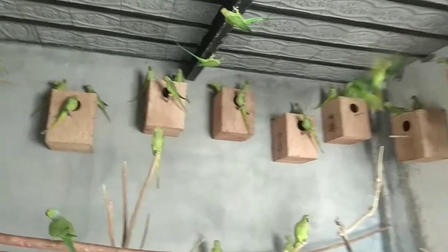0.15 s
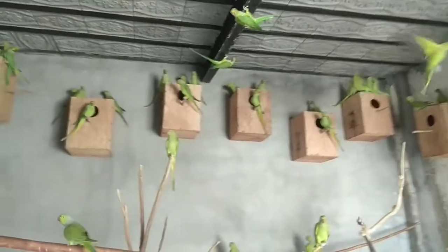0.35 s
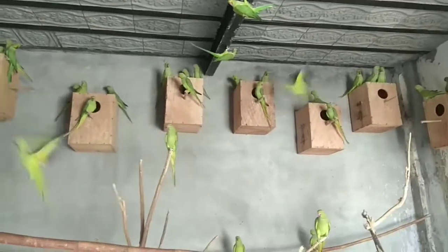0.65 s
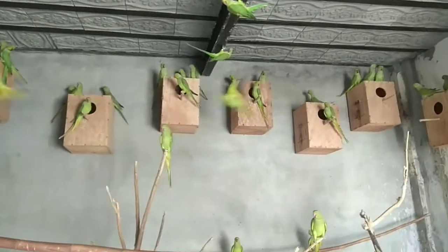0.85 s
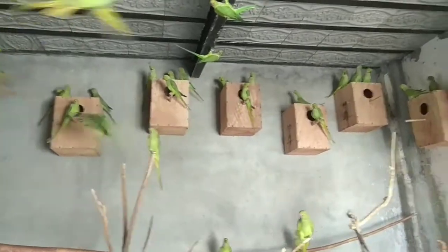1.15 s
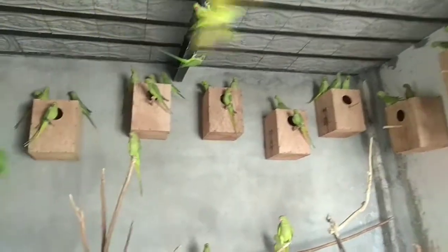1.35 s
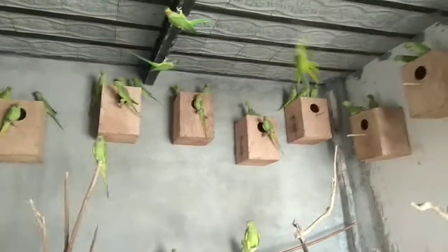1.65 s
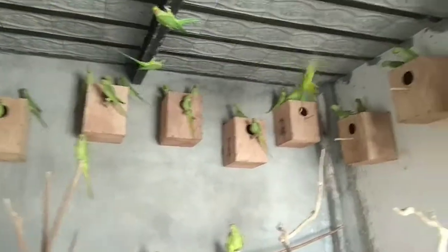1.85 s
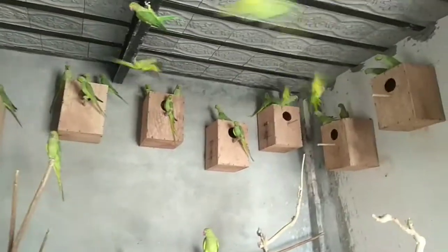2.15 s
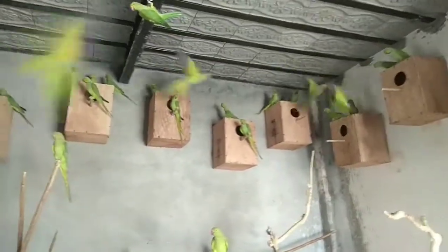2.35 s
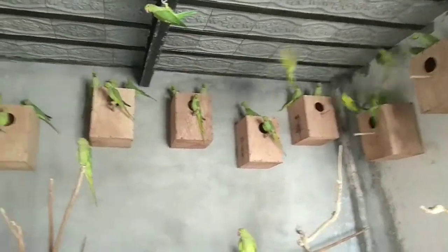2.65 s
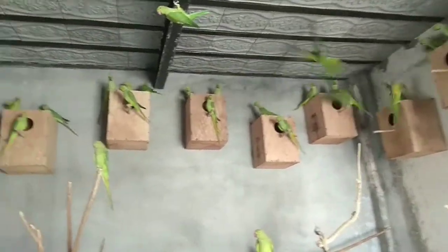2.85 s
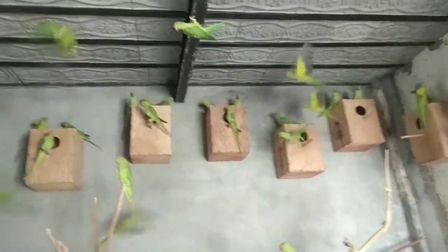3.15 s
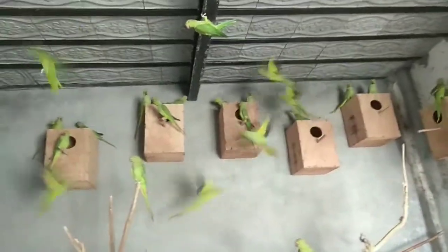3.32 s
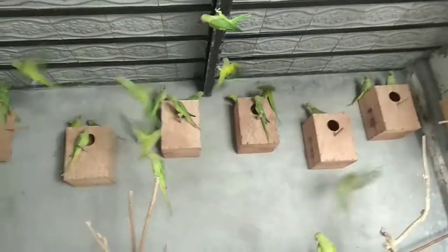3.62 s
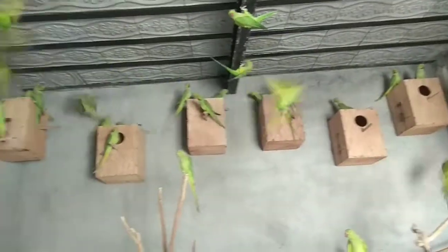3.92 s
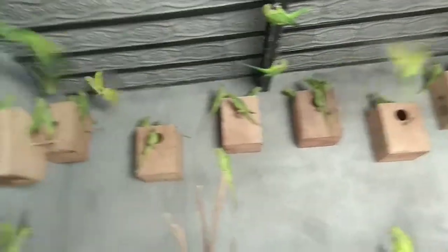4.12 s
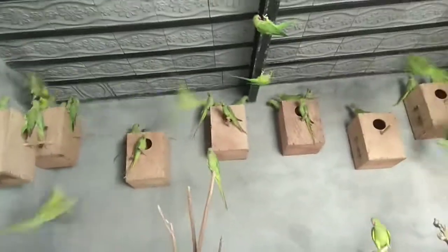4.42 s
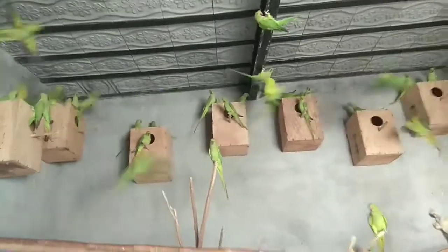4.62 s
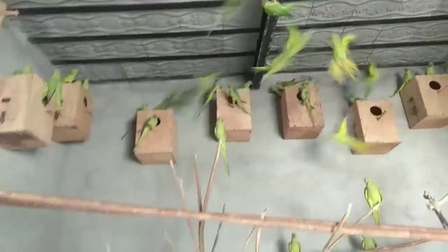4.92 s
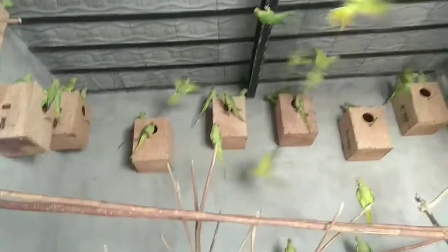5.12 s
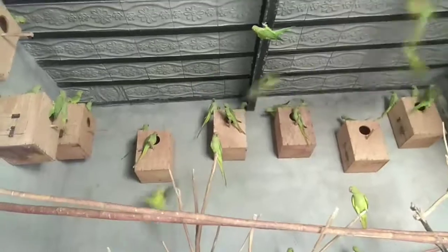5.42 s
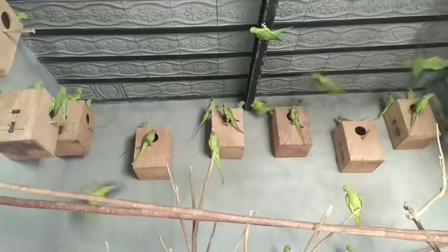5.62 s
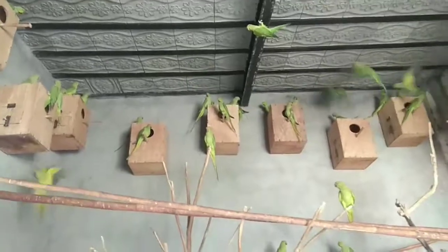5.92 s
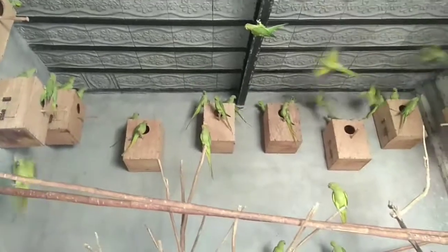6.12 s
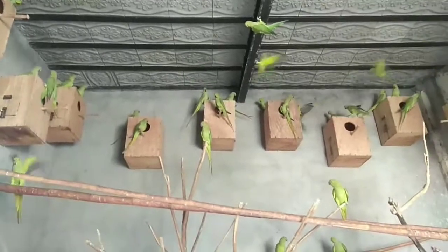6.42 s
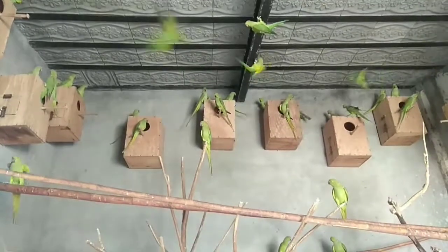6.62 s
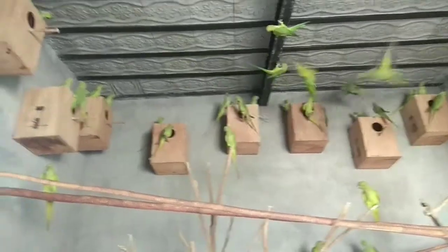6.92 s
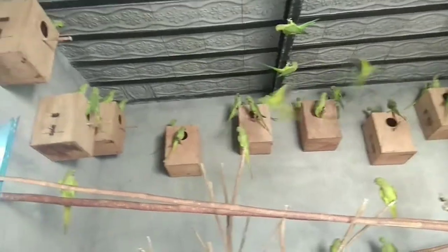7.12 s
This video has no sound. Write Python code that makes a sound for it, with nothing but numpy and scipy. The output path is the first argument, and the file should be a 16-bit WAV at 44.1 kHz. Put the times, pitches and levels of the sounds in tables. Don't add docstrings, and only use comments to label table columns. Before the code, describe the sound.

In a concrete aviary, one parakeet repeats a short, arched, piercing screech about four times a second while others rasp over it and a distant fowl glides softly low. Then croaks, noisy bursts and falling whistles follow as wings thump and rustle close to the microphone. Calls pause, claws scratch wood, and finally a few duller swooping calls and chirps return. Hazy echoes trail every call.

```python
import sys
import numpy as np
from scipy import signal
from scipy.io import wavfile
from scipy.ndimage import uniform_filter1d, minimum_filter1d

SR = 44100
rng = np.random.default_rng(int(sys.argv[2]) if len(sys.argv) > 2 else 0)


def how_loud(loudness_db):
    steps = np.asarray(loudness_db, float) / 20
    return 10 ** steps


def generate_wav(signal):
    frames = np.transpose(np.atleast_2d(signal))
    scaled = np.clip(frames, -1, 1) * 32767
    pcm = np.round(scaled).astype(np.int16)
    wavfile.write(sys.argv[1], SR, pcm)


N = 320607

# (time [s], level [dB])
FLIGHT = [(0, -50), (.28, -41.5), (.44, -45.5), (.84, -38), (1.11, -49.5), (1.28, -38), (1.9, -45),
          (2.5, -36.5), (2.72, -47), (2.8, -38.5), (3.12, -42), (3.2, -33.5), (5.03, -34.5), (5.67, -39.5),
          (6.2, -38), (6.35, -46), (7.03, -41), (7.27, -47)]


def evened(x):
    return x / np.sqrt(np.mean(abs(x) ** 2) + 1e-20)


def read(points, hz):
    f, value = np.transpose(points)
    return np.interp(np.log(hz + 1), np.log(f + 1), value)


def add(mix, s, sound):
    part = mix[..., round(s * SR):][..., :sound.shape[-1]]
    part += sound[..., :part.shape[-1]]


def wobble(count, hz):
    z = rng.standard_normal(count) + 1j * rng.standard_normal(count)
    r = np.exp(-2 * np.pi * hz / SR)
    return evened(signal.lfilter([1], [1, -2 * r, r * r], z))


def air(colour, curve, patchy_db, beat_db, size):
    # (frequency [Hz], left-right likeness [-1 to 1])
    likeness = [(25, 0.77), (60, 0.8), (150, 0.98), (380, 0.93), (950, 0.16), (2380, -0.042), (5980, 0.022),
                (15000, -0.064)]
    hop = size // 4
    frames, hz = N // hop + 5, np.fft.rfftfreq(size, 1 / SR)
    a, b, c, d, patches = rng.standard_normal((frames, len(hz), 5)).T
    patches = uniform_filter1d(patches, size=6, axis=0)
    patches = evened(uniform_filter1d(patches, size=12, axis=1))
    t = np.arange(frames) * hop / SR
    beat_rates_hz = np.geomspace(9, 32, num=14)
    beats = evened(sum(np.sin(2 * np.pi * (f * t + rng.random())) for f in beat_rates_hz))

    same = np.clip(read(likeness, hz), -1, 1)[:, None]
    left = a + 1j * b
    right = same * left + np.sqrt(1 - same ** 2) * (c + 1j * d)
    level_db = read(colour, hz)[:, None] + patchy_db * patches + beat_db * beats
    z = np.array([left, right]) * how_loud(level_db)
    noise = signal.istft(z, nperseg=size, noverlap=size - hop)[1][:, :N]
    s, curve_db = np.transpose(curve)
    return how_loud(np.interp(np.arange(N) / SR, s, curve_db)) * evened(noise)


def wing_thump():
    # (frequency [Hz], level [dB per Hz])
    thump_colour = [(15, -70), (25, -41), (64, -80), (113, -13), (216, -8), (266, 1), (375, -7),
                    (706, -10.5), (769, -10), (928, -16), (1500, -44), (1950, -64), (3300, -120)]
    # (time [s], level above the flock [dB])
    flaps = [(4.46, 3), (5.03, 3), (5.46, 3), (5.698, 3.5), (5.77, 3.5), (6.07, 4), (6.209, 1.5), (6.6, 2)]
    half_width_s = 0.013
    t = np.arange(0, N / SR + .1, .002)
    close_db = sum(db * np.exp(-((t - s) / half_width_s) ** 2) for s, db in flaps)
    curve = np.transpose([t, np.interp(t, *np.transpose(FLIGHT)) + close_db])
    return air(thump_colour, curve, patchy_db=1.87, beat_db=0.94, size=1024)


def feather_rustle():
    # (frequency [Hz], level [dB per Hz])
    rustle_colour = [(410, -27.5), (700, -13), (767, -16.5), (933, -7), (1470, -11.5), (3530, -12),
                     (4120, -12.5), (5150, -14), (13000, -15.5), (15800, -16.5)]
    # (peak time [s], rise [s], fall [s], level [dB])
    flurries = [(.03, 0.084, 0.025, -79.5), (3.3, 0.19, .4, -29), (3.68, 0.047, .3, -32.5),
                (4.45, 0.6, 0.64, -29), (4.95, 0.09, 0.18, -30.5), (5.224, 0.0074, 0.096, -31.5),
                (5.53, 0.076, 0.15, -42.5), (5.88, 0.17, 0.12, -37.5), (6.07, 0.034, 0.053, -43),
                (6.48, 0.051, 0.07, -41.5), (.7, 0.29, .4, -40), (1.5, 0.27, .5, -43),
                (6.95, 0.17, .3, -37)]
    steady_level_db, mean_flight_db = -48, -31.5
    follow = 2.08
    edge_db = 10.5
    t = np.arange(0, N / SR + .1, .002)
    flight_db = np.interp(t, *np.transpose(FLIGHT))
    power = how_loud(2 * (steady_level_db + follow * (flight_db - mean_flight_db)))
    for s, rise, fall, db in flurries:
        distance = np.maximum((s - t) / rise, (t - s) / fall)
        power = power + how_loud(2 * (db - edge_db * distance))
    curve = np.transpose([t, 10 * np.log10(power)])
    return air(rustle_colour, curve, patchy_db=2.0, beat_db=0.3, size=256)


def landings():
    # (time [s], level [dB], decay by 60 dB [s])
    claw_hits = [
        (5.215, -25.5, 0.3),
        (5.8615, -23.5, 1),
        (6.2535, -37.5, 0.86),
    ]
    out, t = np.zeros((2, N)), np.arange(SR // 2) / SR
    for s, db, t60 in claw_hits:
        scratch = signal.lfilter([1, -1], [1, -.85], rng.standard_normal((2, len(t))))
        add(out, s, how_loud(db - 11.0 - 60 * t / t60) * evened(scratch))
    return out


def voice(rows, weight_db, count):
    s, *columns = np.transpose(rows)
    t = np.arange(s[0], s[-1], 1 / SR)
    hz, effort_db, rough = (np.interp(t, s, c) for c in columns)
    jitter = (0.0051 + 0.137 * rough ** 2) * wobble(len(t), 243).real
    turns = np.cumsum(hz * (1 + jitter)) / SR
    out, power = np.zeros(len(t)), 1e-12
    for k in range(1, count + 1):
        gain = how_loud(weight_db(k, k * hz)) * (k * hz < 16500)
        share = np.clip(0.057 + rough * (0.76 + 0.31 * k), 0, 1)
        shake = np.sqrt(1 - share ** 2) + share * wobble(len(t), 820)
        out += gain * (shake * np.exp(2j * np.pi * k * turns)).real
        power = power + gain ** 2 / 2
    effort_db = effort_db + 2.73 * wobble(len(t), 82).real
    return how_loud(effort_db) * out / np.sqrt(power) * signal.windows.tukey(len(t), .2)


def fowl():
    # (time [s], pitch [Hz], effort [dB], roughness [0-1])
    glides = [
        [(.37, 321.4, -46.5, .2), (.43, 335.3, -44, 0.42), (.52, 355, -54.5, 0.3)],
        [(.96, 601, -58, 0), (1.06, 481.4, -44.5, 0.42), (1.16, 374, -52, 0.4)],
        [(1.9, 322.7, -44, 0.37), (2.05, 402, -49.5, 0.1), (2.16, 486.4, -37.5, 0.16), (2.3, 584, -50, 0.1),
         (2.33, 580, -56, 0.25)],
    ]
    # (multiple of the pitch, level [dB])
    partials = [(1, -1), (2, 5), (3, -21)]
    out = np.zeros(N)
    for rows in glides:
        add(out, rows[0][0], voice(rows, lambda k, hz: partials[k - 1][1] + 0 * hz, count=3))
    return signal.sosfilt(signal.butter(2, 300, "high", fs=SR, output="sos"), out)


def parakeets():
    # (frequency [Hz], level [dB])
    beak = [(600, -32), (1300, -13.5), (2200, -4.5), (3300, 2.5), (4500, -0.5), (5400, -8.5), (6800, -11),
            (9000, -12), (11500, -19.5), (15500, -27)]
    # (frequency [Hz], level [dB])
    late_top = [(9000, -3.5), (10600, -15.5), (15000, -11)]
    late_from_s = 6.6
    perches = {"screech": (-2.5, 0.72), "rasp": (-2, 0.38), "hum": (-3, -9.5), "croak": (-1, -6.5),
               "burst": (-5, 2.4), "whistle": (-1, .3), "pipe": (4.5, 3.3), "swoop": (-6.5, 1.33),
               "drop": (-5, 1), "chirp": (-13, -14)}
    # (share of length [0-1], pitch ratio, effort [dB], roughness [0-1])
    screech_shape = [(0, .48, -10, 0.9), (0.129, .7, -2.5, 0.66), (0.201, 0.99, -1.5, .17),
                     (0.501, 0.97, -0.5, 0.18), (.74, .91, 2.5, .24), (1.002, .67, -6.5, 0.36)]
    rasp_shape = [(0, 0.85, 2, 0.52), (.15, 1, -2.5, 0.46), (.45, 1, 0.5, 0.43), (0.749, .95, -5, 0.45),
                  (1, 0.98, -16, .55)]
    hum_shape = [(0, .97, -9, 0.54), (.25, 1, -4.5, 0.45), (.8, 1.005, -1, .12), (1, .99, -20, 0.33)]
    croak_shape = [(0, .98, -5.5, 0.696), (.18, 1.01, 1, 0.51), (.55, 1, -7, .4), (1, .97, -24, 0.7)]
    burst_shape = [(0, .92, -9, 0.614), (.55, 1, 0, 0.744), (1, 1.01, -17, 0.61)]
    whistle_shape = [(0, .96, -3, .08), (.15, 1.005, 4.5, .05), (0.379, .99, 0, .05), (.63, .9, -1, .05),
                     (1, .81, -5.5, .12)]
    pipe_shape = [(0, 0.92, 3, .03), (.13, 0.99, 2, .08), (.4, 0.97, -5, .13), (.65, .935, -7.5, .28),
                  (0.998, 0.75, -12, .3)]
    swoop_shape = [(0, .82, 1.5, 0.486), (0.158, .96, -7, 0.44), (.36, 1, -6, 0.19), (.58, .86, -2, 0.25),
                   (.82, .66, -3, .3), (1, .64, -6, 0.44)]
    drop_shape = [(0, 1.02, -24, 0.17), (.24, 1, 1, .3), (0.501, .89, -5, 0.38), (.7, .78, -4.5, .55),
                  (1, 0.66, -16, 0.91)]
    chirp_shape = [(0, 1.01, -3, 0.018), (.2, 1, 0.5, .02), (.65, .93, -8.5, .02), (1, .87, -17, .06)]
    # (start [s], top pitch [Hz], effort [dB], fundamental [dB])
    screeches = [(.133, 2514, -19.5, -7.5), (.338, 2348, -16.5, -7), (.57, 2336, -16, -7),
                 (.831, 2318, -18, -2.5), (1.058, 2335, -16.5, -8), (1.276, 2322, -15.5, -7.5),
                 (1.494, 2372, -14, -9), (1.718, 2353, -15.5, -9), (1.943, 2352, -14, -7.5),
                 (2.305, 2340, -14.5, -6.5), (2.537, 2324, -20, -11)]
    repeats = [(s, .118, *rest) for s, *rest in screeches]
    # (start [s], length [s], pitch [Hz], effort [dB], fundamental [dB])
    rasps = [(0.416, 0.15, 1630, -16.5, -6.5), (.63, 0.15, 1623, -15.5, -19),
             (0.896, .16, 1612, -21.5, -29)]
    hums = [(2.565, 0.1284, 1610, -20, -14), (6.713, 0.023, 1759, -24, -15)]
    croaks = [(2.525, 0.088, 801, -21, 0), (2.64, .11, 1205, -17.5, -9.5), (2.71, 0.1486, 1617, -23, -9.5),
              (6.836, 0.11, 1852, -25, -17)]
    bursts = [(.80, 0.044, 1699, -24, -16), (2.946, .026, 2580, -28, -5), (3.0, .13, 2132, -18, -3.5),
              (3.695, 0.037, 2337, -18.5, 5), (3.929, 0.0263, 2410, -15.5, 3),
              (7.215, 0.056, 2250, -20, 7.5)]
    whistles = [(3.722, .066, 3550, -16.5, -1.08), (3.945, .07, 3343, -19, -0.89)]
    pipes = [(2.974, .072, 3740, -15.5, -5)]
    swoops = [(4.155, 0.12, 2459, -16.5, -3.5), (6.73, 0.11, 2680, -18.5, -2.5),
              (6.939, .14, 2700, -17.5, -3)]
    drops = [(3.78, .085, 2250, -18, -5.5), (3.985, .105, 2261, -17, -5)]
    chirps = [(0.0, 0.082, 2280, -56, -22), (6.646, 0.062, 2460, -43.5, -9), (7.079, 0.09, 2432, -27.5, 21)]
    kinds = [("screech", screech_shape, repeats), ("rasp", rasp_shape, rasps), ("hum", hum_shape, hums),
             ("croak", croak_shape, croaks), ("burst", burst_shape, bursts),
             ("whistle", whistle_shape, whistles), ("pipe", pipe_shape, pipes),
             ("swoop", swoop_shape, swoops), ("drop", drop_shape, drops), ("chirp", chirp_shape, chirps)]
    vary = [1.8, .05]

    out = np.zeros((2, N))
    for kind, shape, calls in kinds:
        pan_db, bright_db = perches[kind]
        for start, length, top_hz, effort_db, first_db in calls:
            rows = np.array(shape) * [length, top_hz, 1, 1] + [start, 0, effort_db, 0]
            rows[:, 2:] += rng.standard_normal((len(shape), 2)) * vary
            is_late = start > late_from_s

            def tone_db(k, hz):
                mouth_db = read(beak, hz) + is_late * read(late_top, hz)
                return mouth_db + first_db * (k == 1) + bright_db * np.log2(hz / 4000)

            call = voice(rows, tone_db, count=12)
            no_bass = signal.butter(10, 0.86 * rows[:, 1].min(), "high", fs=SR, output="sos")
            call = signal.sosfilt(no_bass, call)
            add(out, max(start, 0), call * how_loud(np.array([[pan_db], [-pan_db]]) / 2))
    return out


def walls(x, tail_db):
    # (frequency [Hz], decay by 60 dB [s])
    ringing = [(200, 0.65), (1500, 0.64), (4000, 0.55), (9000, 0.53), (15000, 0.21)]
    # (delay [s], left level [dB], right level [dB])
    near_echoes = [(.0023, -20, 5), (.0047, 9.5, 6.5), (.0079, -61, -5), (0.012, 7, -48),
                   (0.017, -1.5, -2.5)]
    taps = np.zeros((2, SR))
    at = np.arange(500, SR - 12, 12) + rng.integers(0, 12, (2, (SR - 501) // 12))
    np.put_along_axis(taps, at, rng.choice([-1., 1.], at.shape), 1)
    hz, t, z = signal.stft(taps, SR, nperseg=256)
    tail = signal.istft(z * how_loud(-60 * t / read(ringing, hz)[:, None]), SR, nperseg=256)[1]
    tail *= how_loud(tail_db) / np.linalg.norm(tail[0])
    shifts = rng.uniform(.8, 1.2, (len(near_echoes), 2))
    for (s, left_db, right_db), shift in zip(near_echoes, shifts):
        tail[0, round(s * shift[0] * SR)] += how_loud(left_db)
        tail[1, round(s * shift[1] * SR)] -= how_loud(right_db)
    return signal.fftconvolve(x[None], tail, axes=1)[:, :N]


def scene():
    birds = parakeets() + fowl()
    turn = np.pi * np.arange(N) / SR / .7
    places = [np.sqrt(2 / 3) * np.cos(turn + k * np.pi / 3) for k in range(3)]
    heard = birds + sum(walls(birds.mean(0) * place, tail_db=5.0) for place in places)
    left_db, left_lead = -1.58, 15
    heard = np.array([how_loud(left_db) * heard[0], np.roll(heard[1], left_lead)])
    return how_loud(-1.0) * heard + wing_thump() + feather_rustle() + landings()


def roll_off(x):
    return signal.sosfilt(signal.butter(12, 16050, fs=SR, output="sos"), x)


def record(dry):
    threshold_db, recovery_db_per_s, squeeze = -10.0, 30.0, 0.4
    hiss_db, ceiling = -47, .82
    power_db = 10 * np.log10(abs(uniform_filter1d((dry ** 2).mean(0), size=600)) + 1e-12)
    fall = np.arange(N) * recovery_db_per_s / SR
    recent_peak_db = np.maximum.accumulate(power_db + fall) - fall
    over_db = np.maximum(recent_peak_db - threshold_db, 0)
    ducked = dry / how_loud(squeeze * uniform_filter1d(over_db, size=400))
    ducked = ducked + how_loud(hiss_db) * np.diff(rng.standard_normal((2, N + 1)))
    room_left = np.minimum(1, ceiling / (abs(ducked).max(0) + 1e-9))
    held = ducked * uniform_filter1d(minimum_filter1d(room_left, size=129), size=129)
    return roll_off(held)


dry = scene()
out = record(dry)
generate_wav(out)
```